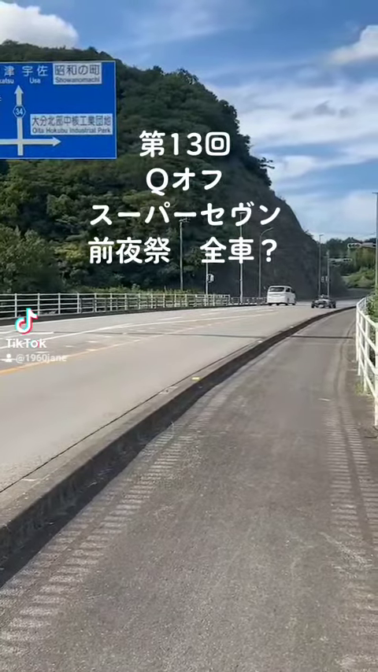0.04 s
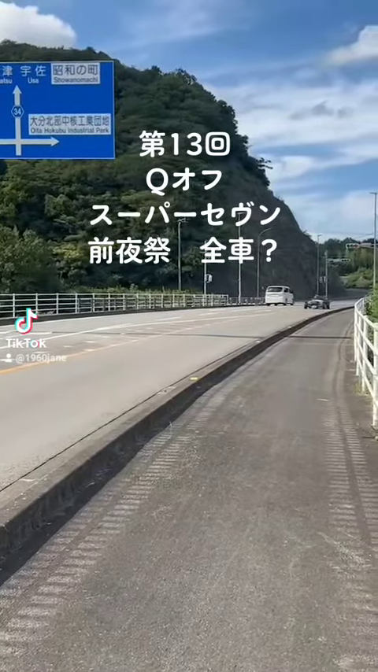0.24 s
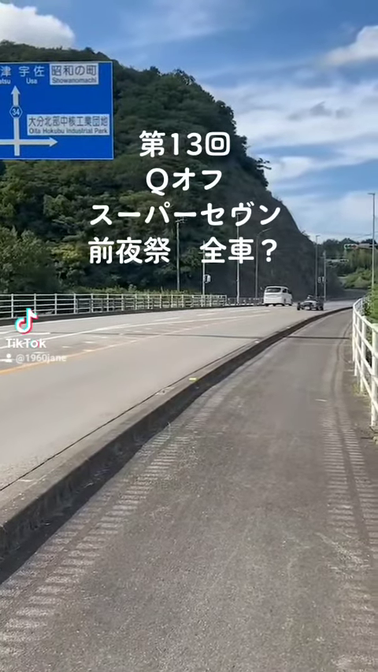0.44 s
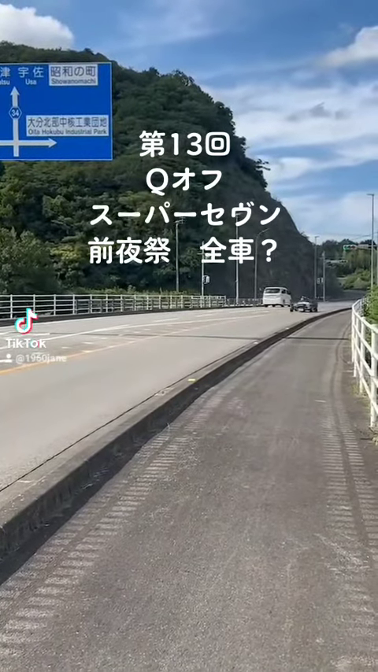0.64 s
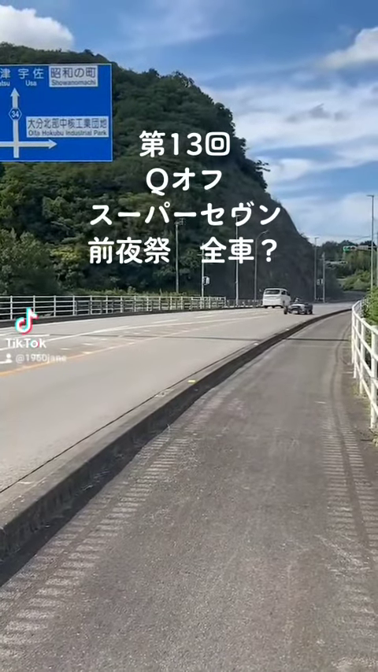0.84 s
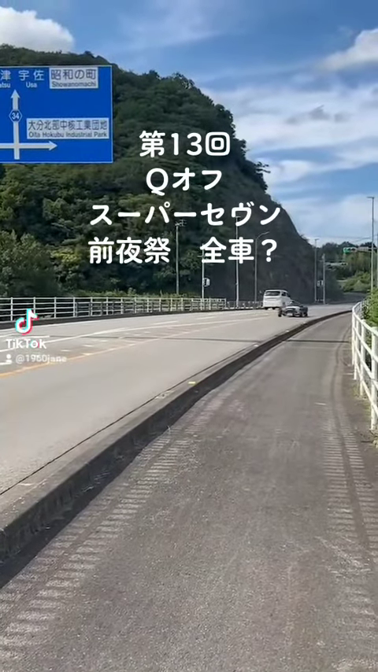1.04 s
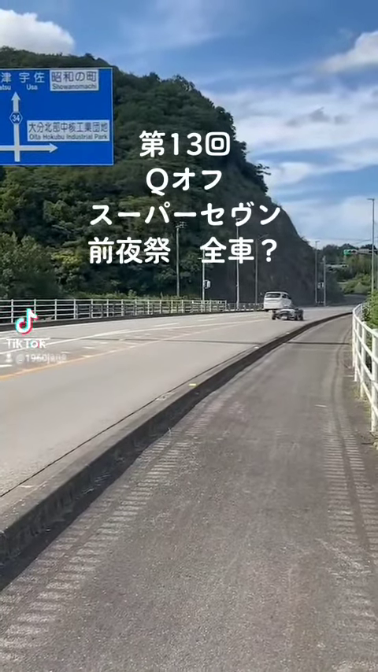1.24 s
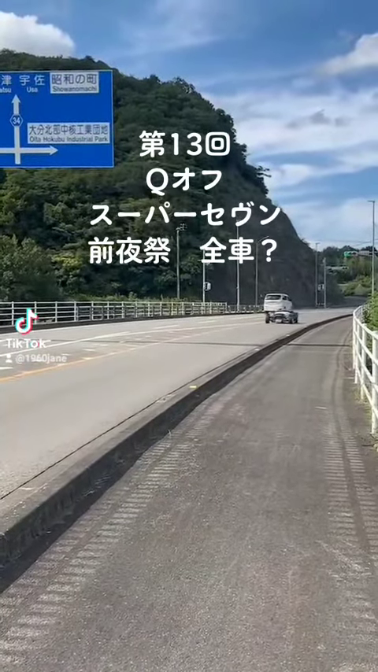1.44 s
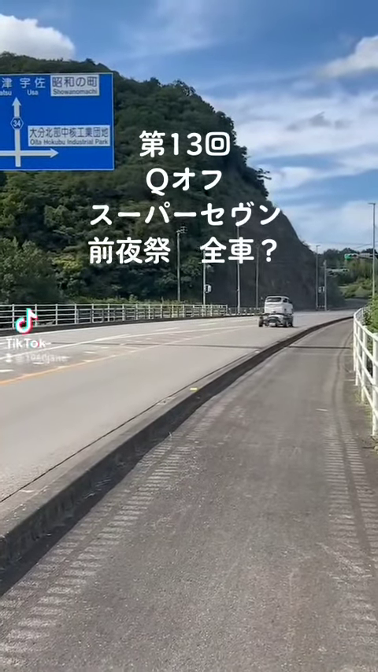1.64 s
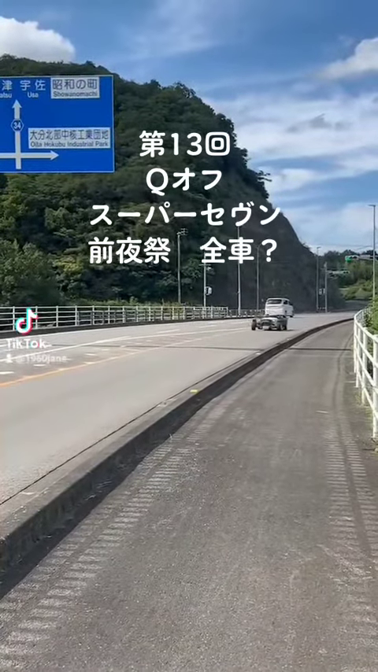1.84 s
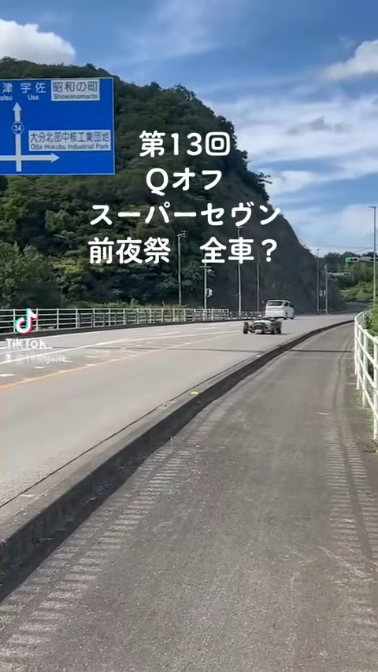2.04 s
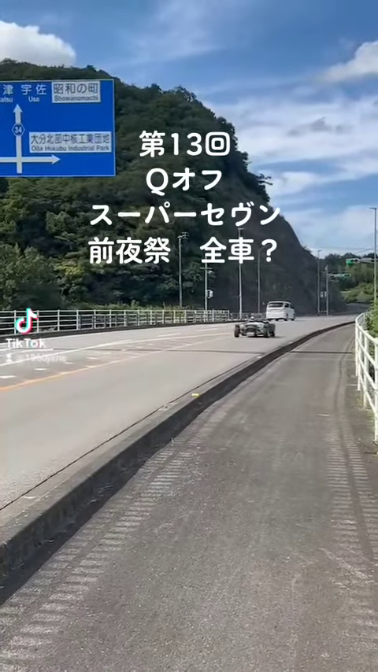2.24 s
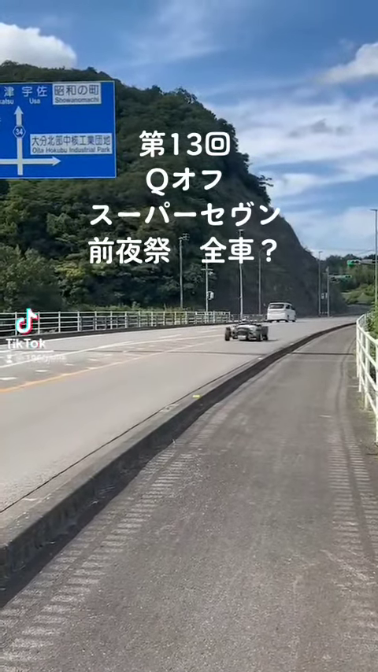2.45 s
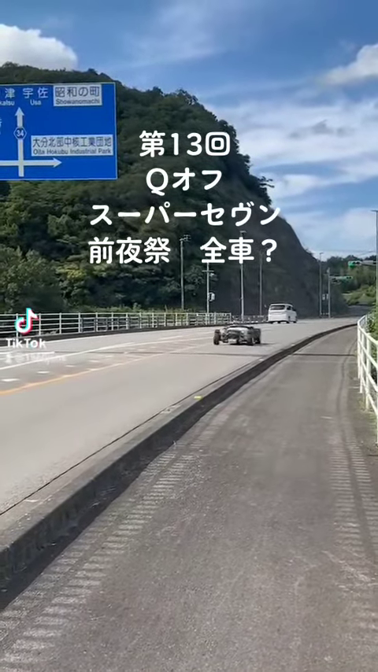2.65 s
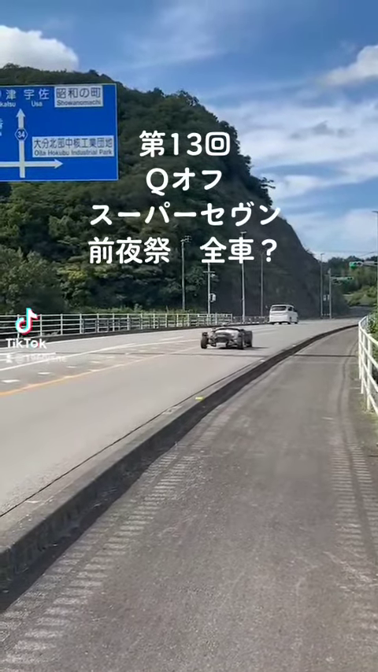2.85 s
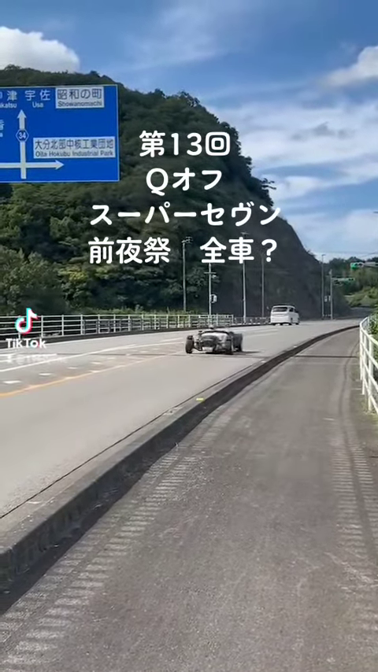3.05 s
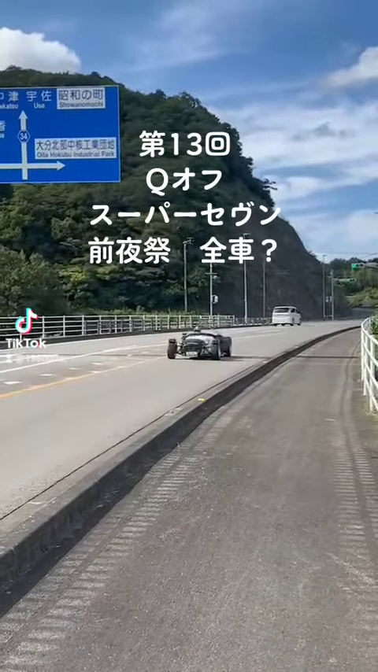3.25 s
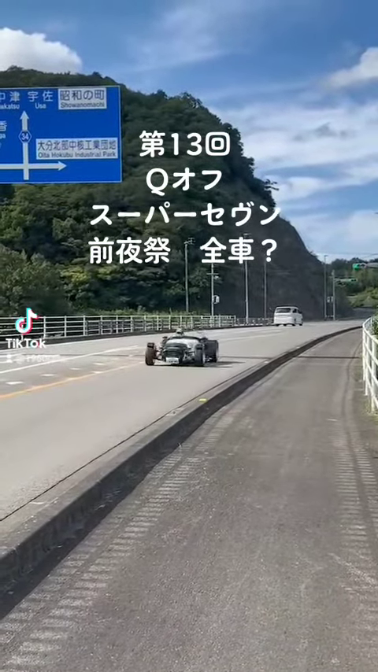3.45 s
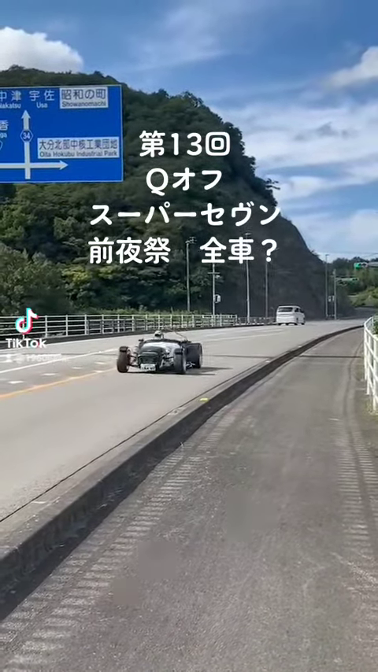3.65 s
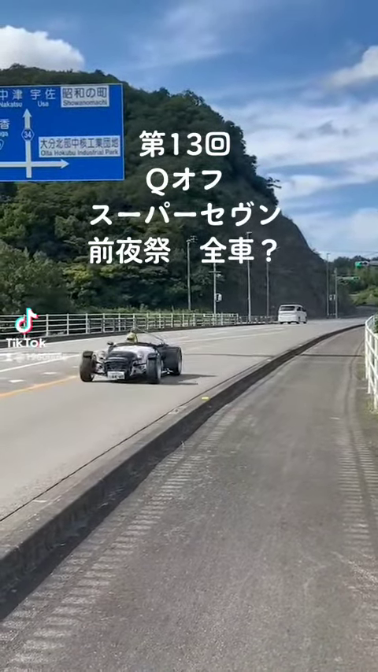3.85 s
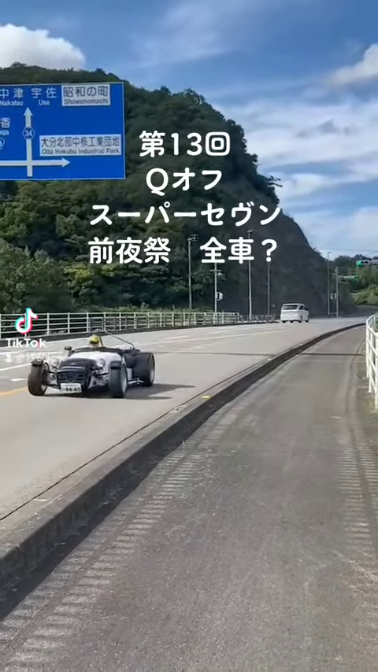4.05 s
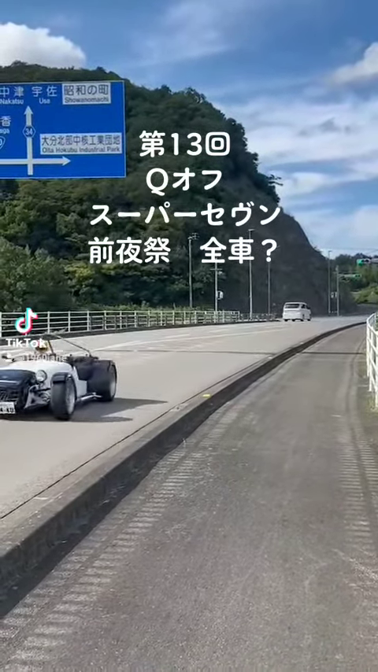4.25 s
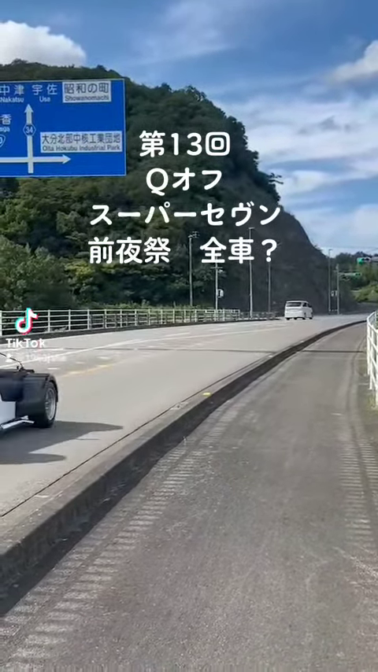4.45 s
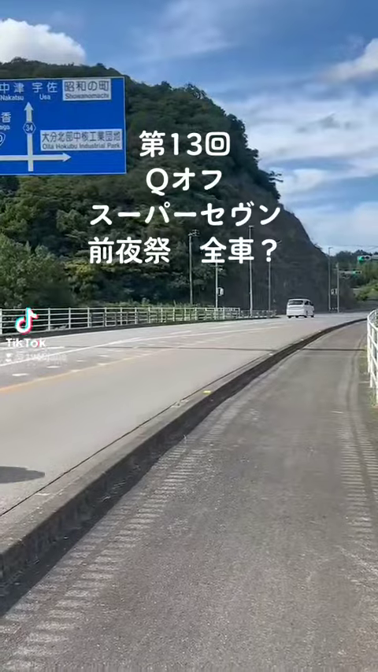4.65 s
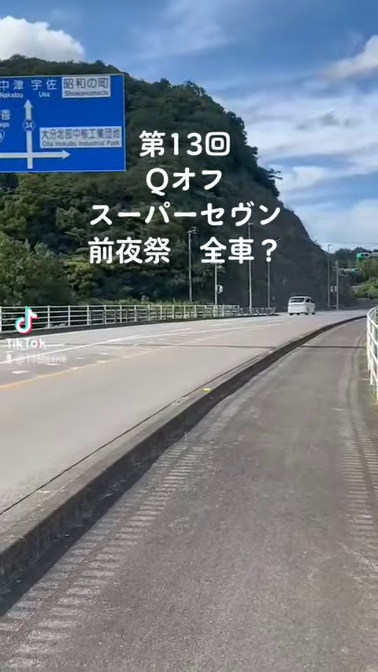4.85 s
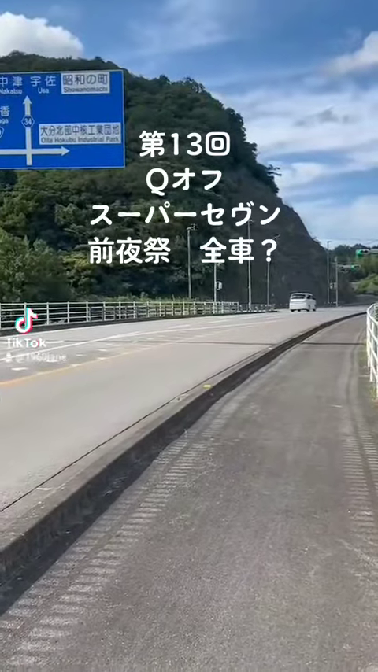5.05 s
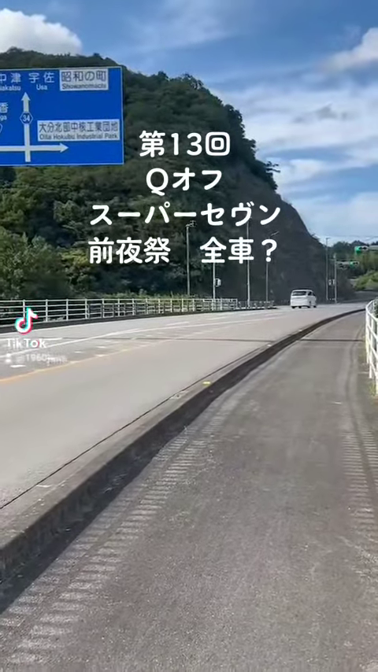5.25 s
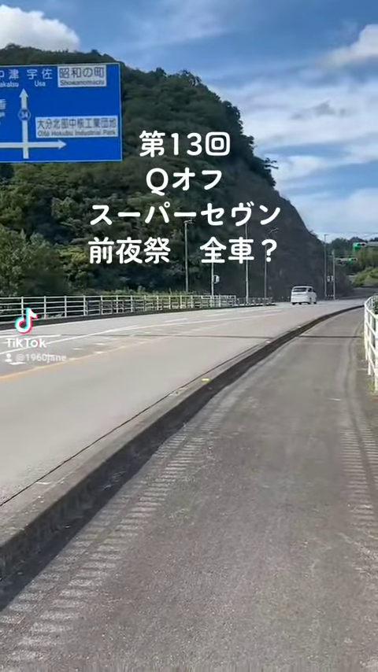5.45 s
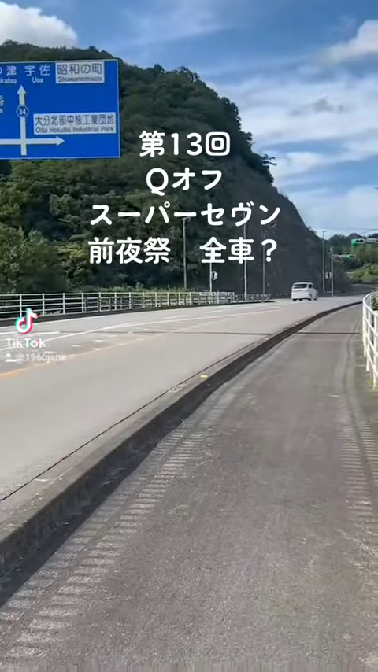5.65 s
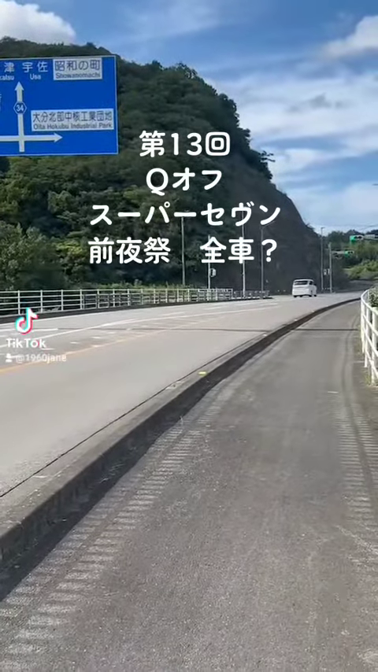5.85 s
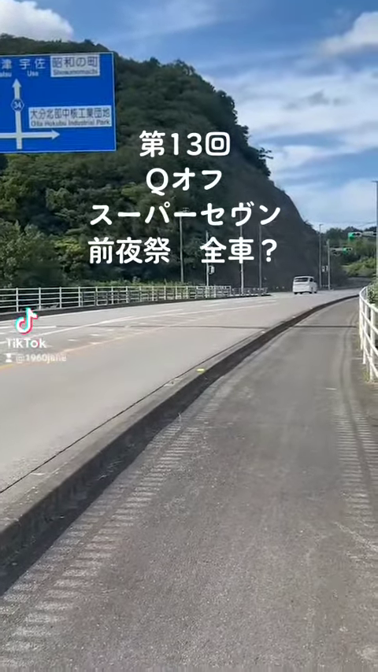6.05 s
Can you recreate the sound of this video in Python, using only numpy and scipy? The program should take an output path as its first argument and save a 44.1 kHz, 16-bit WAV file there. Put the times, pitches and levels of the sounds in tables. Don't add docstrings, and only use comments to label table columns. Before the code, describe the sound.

Insect scraping and the last drone of earlier traffic open the scene, with a faint single bird whistle. Behind them an open car's engine note rises, sags at a gear change, rises and sags again, answered by a hillside. It passes very close with tyre rush and a crackling tailpipe rasp, then turns darker and recedes. Handheld phone at an open roadside, stereo.

```python
import sys
import numpy as np
from scipy import signal
from scipy.io import wavfile

SR = 44100
rng = np.random.default_rng(int(sys.argv[2]) if len(sys.argv) > 2 else 0)


def invert_db(x):
    u = np.asarray(x, float) / 20
    return 10 ** u


def store_pcm(level_fs):
    pcm = np.round(np.clip(level_fs, -1, 1) * 32767).astype(np.int16)
    wavfile.write(sys.argv[1], SR, np.atleast_2d(pcm).T)


N = 269010

# t/s, f/Hz, level/dB
DEEP_CAR = [
    (0.0, 66.66, -23),
    (0.4, 69.93, -22),
    (0.97, 70.66, -25),
    (1.12, 70.94, -34),
    (1.4, 70.2, -44),
]
HIGH_CAR = [
    (0.0, 124.6, -33),
    (0.4, 126.8, -33),
    (0.75, 126.6, -32),
    (1.08, 118.9, -34),
    (1.3, 107.6, -29),
    (1.56, 94, -34.5),
    (1.7, 90.2, -33.7),
    (1.8, 89.8, -36),
]
# multiple of f, level/dB
DEEP_TONES = [(0.748, -23), (1, 0), (1.499, -14), (1.999, -18.5), (2.25, -23), (3, -19.5), (3.998, -27.5)]
HIGH_TONES = [(1, 1), (2, -16)]

# t/s, firing f/Hz, boom level/dB, bark level/dB
SECOND_GEAR = [
    (0.0, 103.3, -32.5, -43),
    (0.3, 108.3, -34, -43.5),
    (0.53, 112.4, -39, -41),
    (0.7, 113.4, -39, -61),
]
THIRD_GEAR = [
    (1.66, 88.07, -31, -51),
    (1.79, 89.17, -38, -41),
    (2.2, 94.6, -32, -36.5),
    (2.95, 102.4, -27, -29),
    (3.1, 103.7, -29, -31),
    (3.25, 103.6, -34, -53),
]
FOURTH_GEAR = [
    (3.84, 88.62, -36, -50),
    (3.98, 84.77, -24.5, -35.5),
    (4.4, 87.57, -13.5, -25),
    (4.9, 90.46, -9, -18.5),
    (5.06, 89.7, -6, -15.5),
    (5.3, 87.26, -7.5, -35),
    (5.48, 85.9, -11.5, -30.5),
    (5.62, 86.92, -12.5, -36),
    (6.1, 89.9, -18, -39.5),
]
# multiple of firing f, index of the level control it follows, level over that/dB
EXHAUST_ORDERS = [(1, 0, 0), (2, 1, 0), (3, 2, .3), (4, 3, .3), (5, 3, -4), (6, 4, -1), (7, 4, 1),
                  (8, 4, 0)]
# multiple of firing f, level over boom/dB
UNEVEN_LINES = [(0.498, -27.5), (0.751, -29.5), (1.249, -28), (1.5, -23), (1.75, -26.5), (2.501, -33),
                (3.5, -35)]
# order 2 over boom/dB, orders 4 and 7 over bark/dB
SECOND_COLOUR_DB = [-20, -5.5, -22]
THIRD_COLOUR_DB = [-19.5, -8, -28]
FOURTH_COLOUR_DB = [-21, -2, -23.5]
# f/Hz, level/dB
SILENCER = [(470, 0), (510, -14), (580, -12), (600, 0)]
# t/s, spread/s, level/dB, level once the body shades it/dB
PASS_SWING = [
    (5.15, 0.49, 7.5, -2.5),
    (5.0, 0.14, -15.5, -15.5),
    (5.08, 0.25, 10.5, -11.5),
]

ROAR_CENTRES_HZ = [130, 750, 2100, 4000, 8500]
# f/Hz, density/dB per Hz
ROAR_COLOUR = [(30, -70), (50, -64.5), (80, -46.5), (130, -59), (220, -64), (400, -67), (700, -73.5),
               (1300, -72), (2200, -78.5), (3500, -93.5), (4200, -102), (6000, -112), (8000, -111.5),
               (10000, -115), (12500, -117)]
# level at first/dB, fading/dB per s
LEAVING = [
    (6, -7.5),
    (-15, -9.5),
    (-1.5, -5),
    (-4, -7.5),
    (1.8, -7),
]
# t of passing/s, level/dB, closeness/s, steepness with distance, shade behind/dB
PASSING = [
    (5.0, 10.5, 0.39, 0.7, -6),
    (4.99, 21, 0.32, 1.542, -14.5),
    (4.654, 18, 0.38, 1.594, 0.5),
    (4.96, 21.5, 0.4, 1.57, -12),
    (5.004, 30, 0.17, 1.64, -3),
]
# f/Hz, side minus mid level/dB
WIDTH = [(120, -46), (220, -22), (350, -20), (540, -2), (840, -5.5), (1300, -7), (2000, -19.5), (2600, -14),
         (4300, -0.5), (5100, 2.5), (6200, -3), (8500, -7.5), (10500, 4), (13000, 6.5)]
# t/s, spread/dB, left lead/dB
BEARING = [(0.0, 9, 2.5), (0.8, 6.5, 1.5), (1.6, 2.5, 0.5), (2.4, -1, -2), (2.85, -9, -1.4), (3.7, -12, -1),
           (4.25, -13.5, -1.5), (4.62, -18, 1.5), (4.8, -21.5, 2.8), (5.0, -9.5, 1.5), (5.22, 9.5, 9.5),
           (5.42, 15.5, 8.5), (5.7, 10, 1), (6.1, 9.5, -2)]
# t/s, share cancelled (0-1), share added (0-1)
APPROACH_NULL = [
    (1.6, 0, 0.13),
    (2.6, 0.2, .4),
    (3.0, 0.5, 0.13),
    (4.2, 0.3, 0.33),
    (4.7, 0.4, 0),
    (5.3, 0.18, 0.13),
    (5.5, 0, .3),
]
# low f/Hz, high f/Hz
NULL_HZ = [1645, 1854]
LIFT_HZ = [5300, 5700]
# t/s, dip f/Hz, dip level/dB, crest level/dB
GROUND_DIP = [
    (4.55, 2320, -1, -4),
    (4.72, 2200, -1, -4.5),
    (4.9, 1660, 1, 3.5),
    (5.05, 1544, -1.5, 2.5),
    (5.2, 1456, -7.5, 0),
    (5.35, 1220, -7.5, 5),
    (5.6, 920, -7, -2),
    (6.1, 890, 4.5, 4),
]

RASP_TIMES_S = [0.078, .29, 0.501, .71, .92, 1.15, 1.351, 1.55, 1.8, 2.02, 2.288, 2.5, 2.71, 2.951, 3.191,
                3.428, 3.68, 3.948, 4.182, 4.472, 4.699, 4.932, 5.171, 5.402, 5.61, 5.831, 6.058]
# t/s, f/Hz, level/dB
BIRD = [
    (1.29, 2250, -78),
    (1.31, 2350, -57),
    (1.34, 2450, -62.5),
    (1.37, 2500, -50),
    (1.39, 2440, -64),
    (1.42, 2410, -66),
    (1.55, 2470, -62),
]

# t/s, f/Hz, level/dB
ROCK_ECHO = [
    (1.4, 71.5, -35),
    (1.55, 76.6, -33),
    (1.85, 80.97, -33),
    (2.5, 86.46, -30),
    (3.05, 89.2, -34),
    (3.22, 89.5, -41),
]
LATE_ECHO = [
    (3.4, 96.8, -31.5),
    (3.6, 99.3, -27.5),
    (3.9, 100.6, -35),
    (4.2, 106.2, -29),
    (4.5, 103.2, -48),
]
# multiple of f, level/dB
ECHO_TONES = [(1, -2.5), (2, -24.5), (3, -19), (4, -23)]

# t/s, f/Hz, level/dB
CLUTCH_IN = [
    (3.15, 105, -29),
    (3.25, 98.8, -33),
    (3.35, 94, -21.5),
    (3.45, 84.25, -23),
    (3.55, 76.6, -27.5),
    (3.65, 68.9, -22),
    (3.75, 63.3, -39),
    (3.85, 74.6, -23),
    (3.95, 83.2, -41),
]
# multiple of f, level/dB
CLUTCH_TONES = [(1, 0), (2, -20.5), (3, -23.5)]
# t/s, f/Hz, level/dB
CLUTCH_BITE = [
    (3.83, 88.9, -50),
    (3.87, 88.4, -32.5),
    (3.95, 86.96, -38.5),
    (4.04, 83.5, -31.5),
]
# multiple of f, level/dB
BITE_TONES = [(3, 0), (4, -8), (5, -12)]
# t/s, rasp level/dB, resonance f/Hz
TAILPIPE = [
    (4.8, -46, 635),
    (4.93, -35, 638),
    (5.0, -23.5, 641),
    (5.06, -33, 630),
    (5.13, -26, 615),
    (5.2, -33, 605),
    (5.27, -29, 590),
    (5.32, -45, 585),
    (5.4, -55, 580),
]

# low f/Hz, high f/Hz
SIDE_BANDS_HZ = [(190, 1950), (4750, 5400), (8300, 13000)]


def rms_one(x):
    return x / np.sqrt(np.mean(x ** 2) + 1e-20)


def in_time(rows):
    s, *columns = np.transpose(rows)
    return [np.interp(np.arange(N) / SR, s, column) for column in columns]


def sounding(rows, fade_s=0.066):
    t = np.arange(N) / SR
    inside_s = np.minimum(t - rows[0][0], rows[-1][0] - t)
    return np.clip(inside_s / fade_s + 1, 0, 1)


def at_hz(points, hz):
    points_hz, values = np.transpose(points)
    return np.interp(np.log(hz), np.log(points_hz), values)


def drift(rate):
    r = np.exp(-80 * np.pi * rate / SR)
    noise = rng.standard_normal(N // 40 + 2002)
    slow = signal.lfilter([1], [1, -2 * r, r * r], noise)[2000:]
    return np.interp(np.arange(N) / 40, np.arange(len(slow)), rms_one(slow))


def band(x, low_hz, high_hz, order=2):
    return signal.sosfilt(signal.butter(order, [low_hz, high_hz], "band", fs=SR, output="sos"), x)


def shaded(at_s):
    return 0.5 + 0.5 * np.tanh((np.arange(N) / SR - at_s) / 0.038 / 2)


def swell(at_s, spread_s):
    return np.exp(-((np.arange(N) / SR - at_s) / spread_s) ** 2)


def crank(hz, jitter):
    return np.cumsum(hz) / SR + jitter * drift(20)


def partial(turns, multiple, db, flutter_db, locked=False):
    start = 0 if locked else rng.random()
    phase = 2 * np.pi * (multiple * turns + start)
    return np.sqrt(2) * invert_db(db + flutter_db * drift(12.1)) * np.sin(phase)


def boom(rows, tones, jitter, flutter_db):
    hz, level_db = in_time(rows)
    turns = crank(hz, jitter)
    note = sum(partial(turns, multiple, level_db + db, flutter_db) for multiple, db in tones)
    return sounding(rows) * note


def earlier_cars():
    deep = boom(DEEP_CAR, DEEP_TONES, jitter=0.012, flutter_db=1.5)
    high = boom(HIGH_CAR, HIGH_TONES, jitter=0.025, flutter_db=2.0)
    return deep + high


def top_rev_swell():
    return swell(2.99, 0.25)


def order_levels(gear, colour_db):
    hz, boom_db, bark_db = in_time(gear)
    behind = shaded(5.36)
    second, fourth, seventh = [own_db + db * swell(s, spread_s) + shade_db * behind
                               for own_db, (s, spread_s, db, shade_db) in zip(colour_db, PASS_SWING)]
    seventh = seventh + 7.0 * top_rev_swell()
    return hz, [boom_db, boom_db + second, bark_db, bark_db + fourth, bark_db + seventh]


def sports_car(gear, colour_db, jitter, flutter_db, uneven_db):
    hz, controls_db = order_levels(gear, colour_db)
    turns = crank(hz, jitter)
    note = 0
    for multiple, control, db in EXHAUST_ORDERS:
        level_db = controls_db[control] + db
        if multiple in (5, 6):
            level_db = level_db + at_hz(SILENCER, multiple * hz)
        note = note + partial(turns, multiple, level_db, flutter_db * (multiple > 1), locked=True)
    for multiple, db in UNEVEN_LINES:
        note = note + partial(turns, multiple, db + uneven_db + controls_db[0], 0.88)
    return sounding(gear) * note, turns


def roar_levels():
    t, behind = np.arange(N) / SR, shaded(5.26)
    near = []
    for pass_s, db, close_s, steepness, shade_db in PASSING:
        distance_db = 10 * steepness * np.log10(1 + ((t - pass_s) / close_s) ** 2)
        near.append(db - distance_db + shade_db * behind)
    near[1] = near[1] + 5.0 * top_rev_swell()
    near[2] = near[2] - 3.5 * swell(5.26, 0.13)
    return [10 * np.log10(invert_db(2 * db) + invert_db(2 * (first_db + fade * t)))
            for db, (first_db, fade) in zip(near, LEAVING)]


def ground_bounce(hz, dip_hz, dip_db, crest_db):
    off_dip = np.log(hz / dip_hz)
    bounce_db = dip_db * np.exp(-(off_dip / 0.22) ** 2)
    bounce_db = bounce_db + crest_db * np.exp(-((off_dip + 0.41) / 0.047) ** 2)
    return bounce_db + 0.86 * crest_db * np.exp(-((off_dip - 0.36) / 0.16) ** 2)


def road_roar(puffs):
    step = 64
    moves_db = np.array(roar_levels())[:, ::step]
    spread_db, lead_db = np.array(in_time(BEARING))[:, ::step]
    dip_hz, dip_db, crest_db = np.array(in_time(GROUND_DIP))[:, ::step]
    coarse, fine = np.arange(0, N, step), np.arange(N)
    white = rng.standard_normal((2, 2, N))
    edges_hz = 22 * 2 ** np.arange(0, 9.4, 1 / 3)
    out = np.zeros((2, N))
    for k, (low, high) in enumerate(zip(edges_hz, edges_hz[1:])):
        hz = np.sqrt(low * high)
        shares = [np.interp(np.log(hz), np.log(ROAR_CENTRES_HZ), row) for row in np.eye(5)]
        level_db = at_hz(ROAR_COLOUR, hz) + np.dot(shares, moves_db)
        level_db = level_db + ground_bounce(hz, dip_hz, dip_db, crest_db)
        level_db = level_db + (0.6 + 1.2 * shares[4]) * drift(7)[::step]
        gain = invert_db(level_db) * np.sqrt(SR / 2.4)
        chop = 1 + np.dot(shares[1:], [0.089, 0.12, 0.13, 0.15]) * puffs
        mid, other = band(white[k % 2], low, high) * chop
        steered = hz < 3000
        width = invert_db(at_hz(WIDTH, hz) + spread_db * steered)
        lean = (1 + width ** 2) / 2 * np.tanh(lead_db * np.log(10) / 20)
        tipped = np.clip(lean, -width, width) * steered
        loose = np.sqrt(width ** 2 - tipped ** 2)
        shared, tip, diffuse = [np.interp(fine, coarse, gain * g) for g in (1, tipped, loose)]
        out += [shared * mid, tip * mid + diffuse * other]
    cancelled, added = in_time(APPROACH_NULL)
    return out - cancelled * band(out, *NULL_HZ, order=1) + added * band(out, *LIFT_HZ, order=1)


def insect():
    t = np.arange(N) / SR
    middles = np.array(RASP_TIMES_S)
    nearest = np.searchsorted((middles[1:] + middles[:-1]) / 2, t)
    since = t - middles[nearest]
    attack = np.clip(since / 0.09 + 0.9, 0, 1) ** 1.2
    stop = np.clip((0.04 - since) / 0.012, 0, 1)
    teeth = invert_db(3.7 * drift(120))
    buzz = rms_one(band(rng.standard_normal((2, N)), 10800, 12300, order=4))
    return buzz * (attack * stop + 0.14) * teeth * invert_db([[-70], [-63]])


def bird():
    hz, db = in_time(BIRD)
    return sounding(BIRD, fade_s=0.01) * partial(crank(hz, jitter=0.12), 1, db, flutter_db=1.5)


def rock_echo():
    first = boom(ROCK_ECHO, ECHO_TONES, jitter=0.025, flutter_db=3.5)
    late = boom(LATE_ECHO, ECHO_TONES, jitter=0.0063, flutter_db=-1.5)
    return first + late


def clutch_change():
    falling = boom(CLUTCH_IN, CLUTCH_TONES, jitter=0.029, flutter_db=2.0)
    biting = boom(CLUTCH_BITE, BITE_TONES, jitter=0.025, flutter_db=3.0)
    return falling + biting


def tailpipe(turns):
    level_db, hz = in_time(TAILPIPE)
    puffs = np.exp(30 * (np.cos(2 * np.pi * turns) - 1)) * (1 + 2.5 * drift(150))
    ringing = signal.butter(2, 28, fs=SR, output="sos")
    note = 0
    for ratio, db in [(1, 0), (1.48, -7)]:
        carrier = np.exp(2j * np.pi * ratio * np.cumsum(hz) / SR)
        envelope = signal.sosfilt(ringing, puffs / carrier)
        size = np.abs(envelope)
        envelope = envelope / (size + size.mean()) * 2.8
        note = note + invert_db(db) * np.real(carrier * envelope)
    return sounding(TAILPIPE) * invert_db(level_db) * note


def scene():
    tones = earlier_cars()
    second, _ = sports_car(SECOND_GEAR, SECOND_COLOUR_DB, jitter=0.008, flutter_db=1.5, uneven_db=-1)
    third, _ = sports_car(THIRD_GEAR, THIRD_COLOUR_DB, jitter=0.005, flutter_db=1.2, uneven_db=3)
    fourth, turns = sports_car(FOURTH_GEAR, FOURTH_COLOUR_DB, jitter=0.005, flutter_db=1.5, uneven_db=-1)
    tones = tones + second + third + fourth
    tones = tones + bird() + rock_echo() + clutch_change() + tailpipe(turns)
    puffs = sounding(FOURTH_GEAR) * np.sin(2 * np.pi * turns)
    mid, side = road_roar(puffs) + insect()
    spread_db, lead_db = in_time(BEARING)
    lean = np.tanh(lead_db / 20.0) * np.minimum(invert_db(spread_db + 16.5), 1)
    side = side + band(tones, 330, 1500) * lean
    mid = mid + tones
    return np.array([mid + side, mid - side])


def band_limit(x):
    return signal.sosfilt(signal.butter(12, 13800, fs=SR, output="sos"), x)


def record(dry):
    heard = 1.564 * np.tanh(dry / 1.63)
    mid, side = (heard[0] + heard[1]) / 2, (heard[0] - heard[1]) / 2
    mid = mid - 0.21 * band(mid, 5500, 6700, order=1)
    mid = signal.lfilter(*signal.iirnotch(5020, 19.0, fs=SR), mid)
    mid = signal.sosfilt(signal.cheby2(8, 36, 13400, fs=SR, output="sos"), mid)
    side = sum(band(side, low, high, order=8) for low, high in SIDE_BANDS_HZ)
    return band_limit(np.array([mid + side, mid - side]))


dry = scene()
out = record(dry)
store_pcm(out)
```